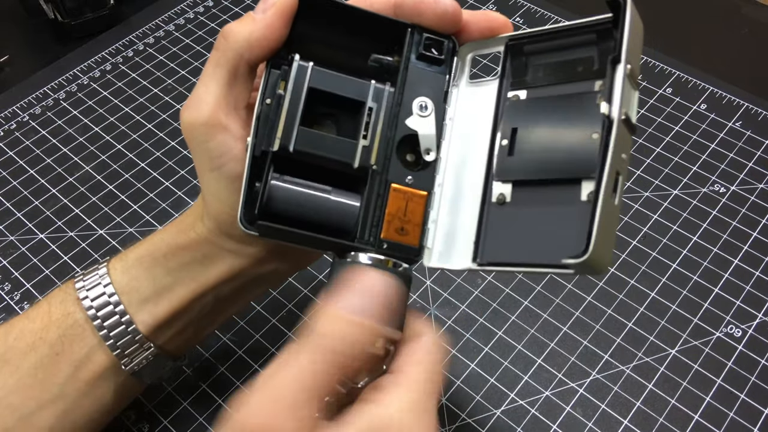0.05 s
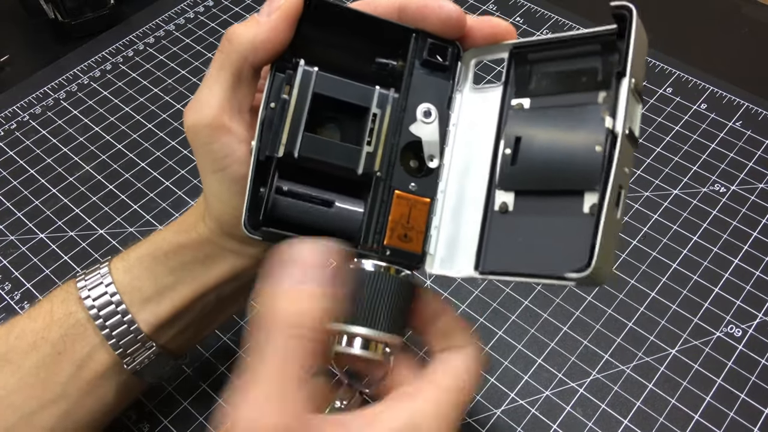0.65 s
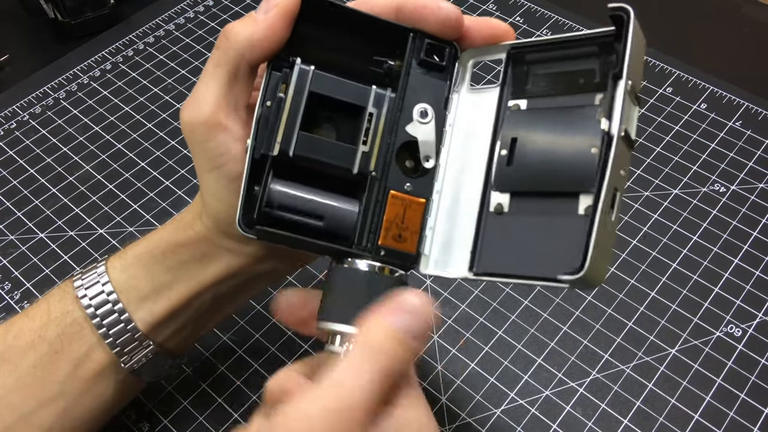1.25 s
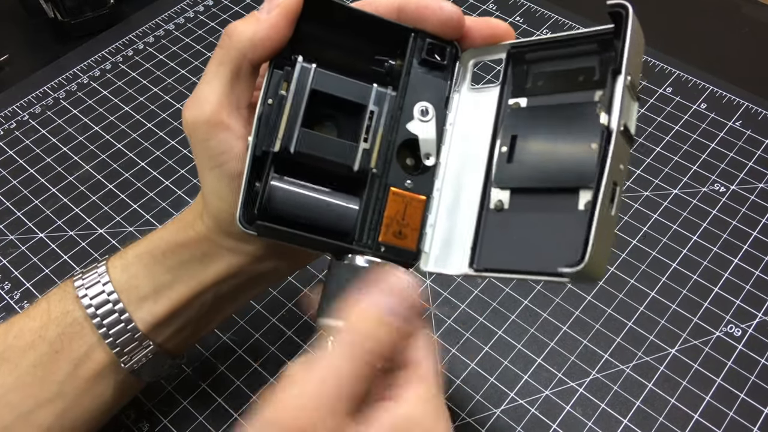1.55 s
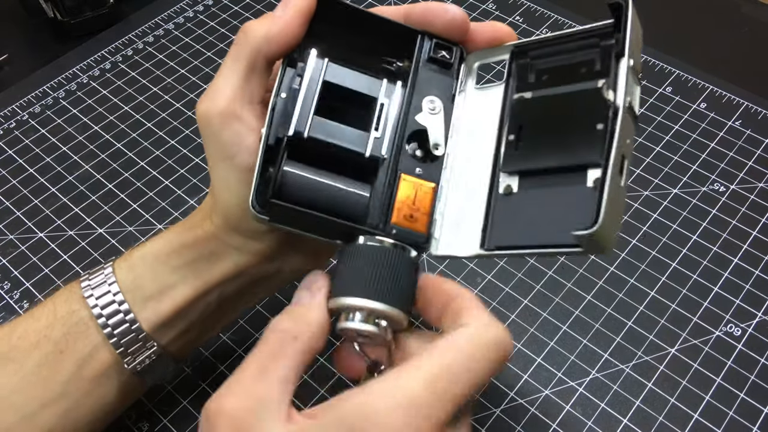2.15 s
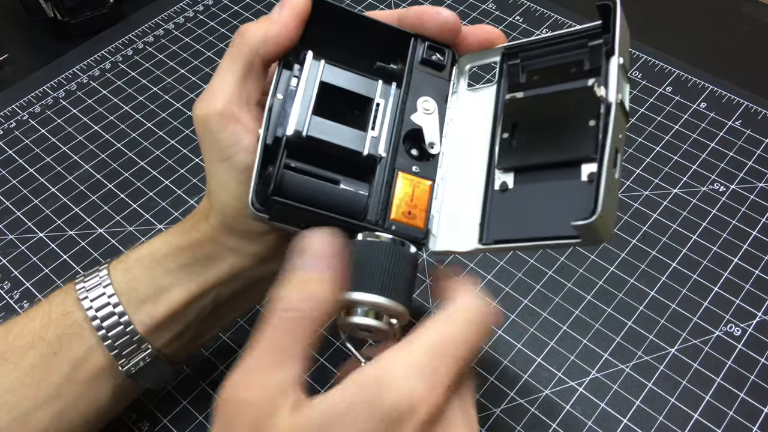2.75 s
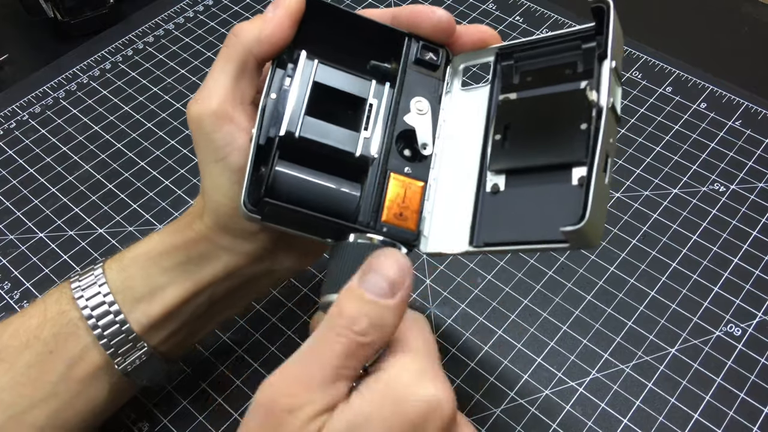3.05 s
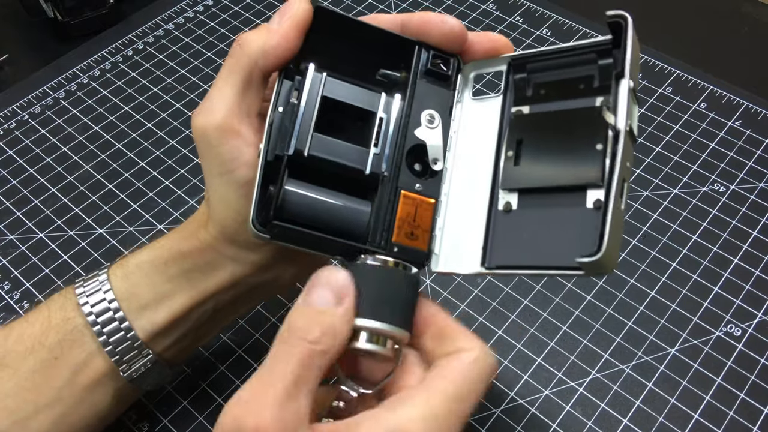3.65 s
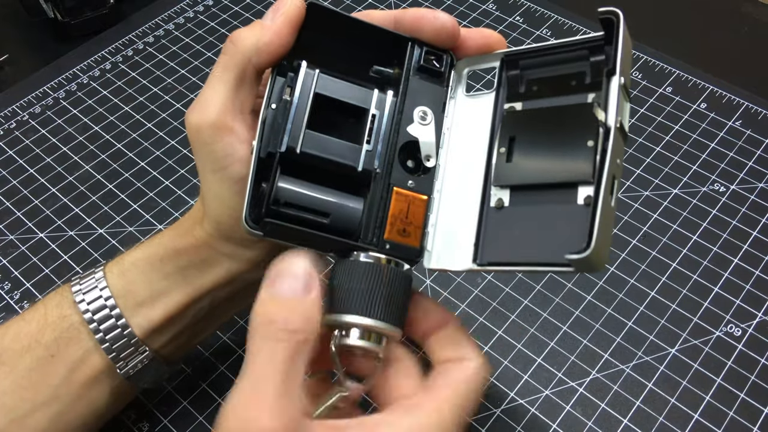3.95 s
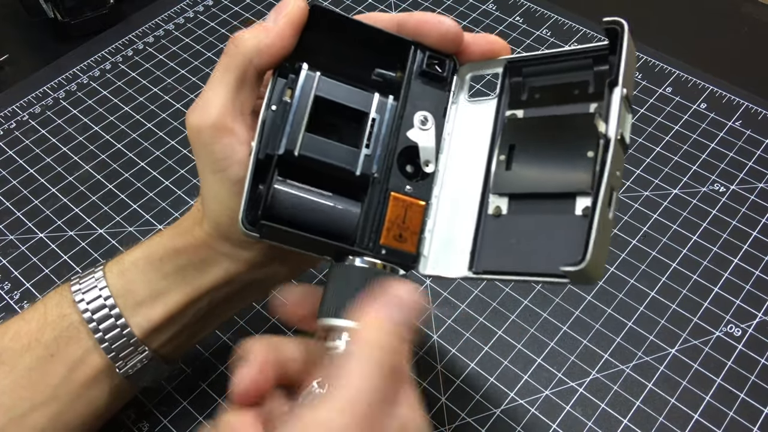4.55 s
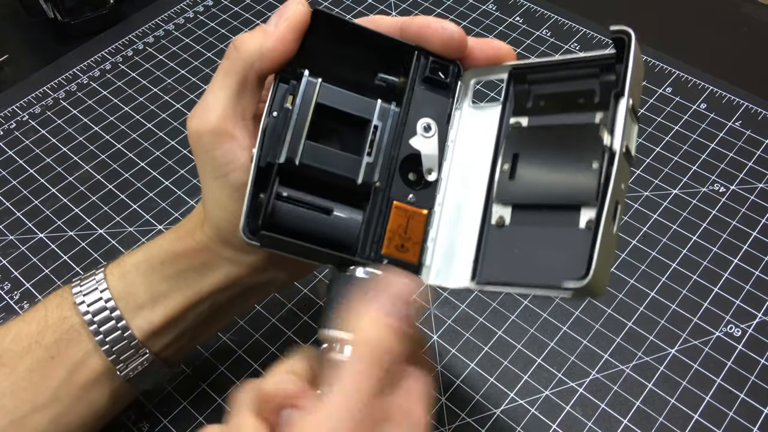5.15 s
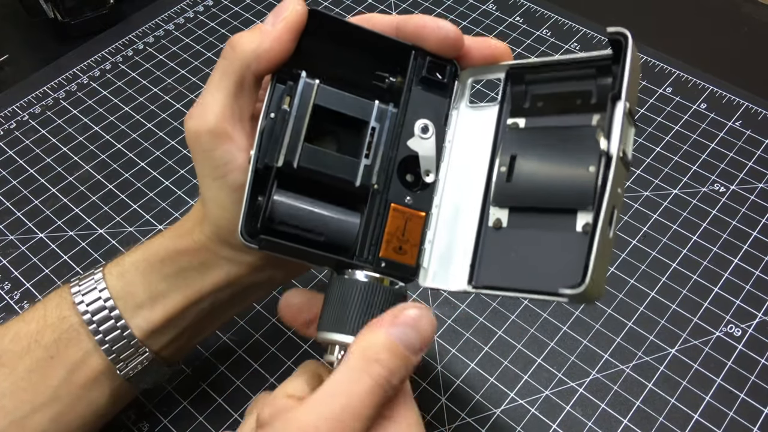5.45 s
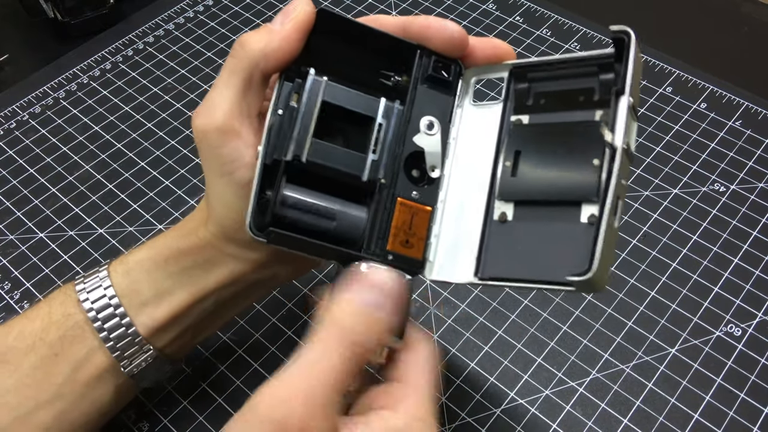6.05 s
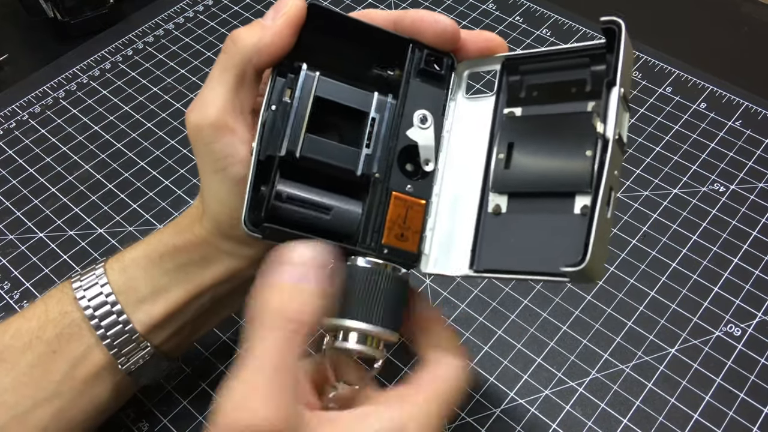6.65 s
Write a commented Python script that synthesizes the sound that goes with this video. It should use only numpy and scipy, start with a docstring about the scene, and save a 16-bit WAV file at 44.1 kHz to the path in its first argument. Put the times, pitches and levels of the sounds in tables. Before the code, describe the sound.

A camera's spring motor is wound by hand, each twist giving a short, bright ratcheting rasp, with light knocks between.

```python
"""A small workshop, one microphone close to a camera whose spring motor is being wound by hand.
Nineteen twists of the knurled grip: in each a steel pawl drops over ratchet teeth, single clicks,
a fast rasp, single clicks again, all ringing the open case. Between twists the fingers take a new hold
and knock the grip; its strap ring ticks now and then, and once a finger slips with a thin squeak.
Behind it are the room's short reverberation and the faint rumble of the building."""
import sys
import numpy as np
from scipy import signal
from scipy.fft import rfft, irfft, next_fast_len
from scipy.io import wavfile
from scipy.ndimage import uniform_filter1d, map_coordinates

SR = 44100
rng = np.random.default_rng(int(sys.argv[2]) if len(sys.argv) > 2 else 0)


def wav_out(sig):
    """Save sig, one row per channel (or a flat mono array), as 16-bit PCM at SR to the path in sys.argv[1]."""
    wavfile.write(sys.argv[1], SR, np.round(np.clip(np.atleast_2d(sig).T, -1, 1) * 32767).astype(np.int16))


N = 303849

# Levels of blows and colours are relative; each layer gets its own gain in the mix.
# colour of the building's rumble: f/Hz, level/dB
RUMBLE_COLOUR = [(7.1, -29), (12, 7.5), (21, 7), (30, -2.5), (59, -15.5), (97, -18.5), (137, -18.5),
                 (177, -29), (229, -34.5), (260, -49.5), (340, -53), (570, -120)]
# slow fade of the rumble: t/s, level/dB
RUMBLE_FADE = [(0, -33), (6.9, -36)]
# bands of the building's low drone: f/Hz, level/dB
DRONE_BANDS = [(70, -58), (135, -58.5)]
# the drone swells about halfway: t/s, gain/dB
DRONE_SWELL = [(2.6, -6), (3.5, 3)]
# colour of the room's hiss: f/Hz, level/dB
HISS_COLOUR = [(120, -27), (200, -2), (363, -9), (451, -16.5), (647, -13), (980, -16), (1910, -10.5),
               (4980, -24.5), (15000, -73)]
# twists of the grip: first drop t/s, wait for the second/s, last drop t/s, top speed/(teeth/s),
# snap level/dB, case ring re snap/dB, take-up ahead of the first drop/s, take-up level/dB
GRIP_TWISTS = [(-0.045, 0.0076, 0.1716, 265, -25.5, -6.5, 0.013, -21),
               (0.3537, 0.012, 0.5359, 196, -24, -7.5, 0.0061, -18),
               (0.7451, 0.011, 0.9249, 202, -24, -6, 0.011, -21.5),
               (1.1107, 0.0099, 1.2865, 182, -24.8, -6, 0.004, -38),
               (1.4641, 0.0098, 1.6562, 202, -24, -6, 0.002, -30),
               (1.8453, 0.0053, 2.0068, 186, -24, -6, 0.021, -26),
               (2.1873, 0.0074, 2.3421, 198, -24.5, -7, 0.0031, -23),
               (2.5254, 0.0076, 2.7025, 203, -24.5, -6, 0.013, -17.5),
               (2.8895, 0.0091, 3.0636, 190, -24, -5, 0.0088, -22),
               (3.242, 0.0081, 3.4758, 200, -24, -7, 0.019, -17.5),
               (3.637, 0.014, 3.8414, 212, -24, -7, 0.026, -37),
               (4.0282, 0.0118, 4.23, 230, -23.3, -8.5, 0.01, -19),
               (4.438, 0.0108, 4.6511, 230, -23.5, -6, 0.006, -27),
               (4.8545, 0.019, 5.0669, 238, -24, -6.5, 0.018, -43),
               (5.2659, 0.018, 5.4224, 117, -23.5, -6.5, 0.012, -21),
               (5.652, 0.014, 5.7837, 200, -24, -7, 0.0049, -18),
               (5.9995, 0.0072, 6.1404, 196, -23.6, -6.5, 0.018, -19),
               (6.3847, 0.0077, 6.5633, 200, -24, -6.5, 0.017, -21.5),
               (6.7706, 0.013, 6.96, 215, -23.5, -8, 0.009, -14)]
# early in some twists the spring's load catches with a hard clack: t/s, snap level/dB, ring level/dB
LOAD_CATCHES = [(0.369, -24, -21), (1.1261, -24, -27), (1.4815, -20, -22), (2.2012, -27, -23),
                (2.9083, -20, -22), (3.6613, -35, -34), (4.0458, -27, -25), (4.4552, -22, -24.5),
                (4.8787, -23, -25), (5.666, -41, -23.5), (6.7864, -22.5, -21.5)]
# colour of one drop of the pawl: f/Hz, level/dB
DROP_COLOUR = [(100, -34), (300.0, -30), (700.0, -16), (1100.0, -9), (1600.0, -10), (3700.0, -4),
               (5200.0, 3), (7500.0, 5), (10000.0, -5), (13000.0, -9.5), (15600.0, -5)]
# resonances of the case and grip: f/Hz, width/Hz, lift/dB
CASE_MODES = [(530, 20, 11.5), (964, 55, 1.2), (1472, 234, 12), (1733, 205, 8), (1945, 40, 7.5),
              (2184, 210, 8.5), (2473, 104, 6), (2706, 284, 7), (2950, 210, 5.5), (3360, 156, 5),
              (4545, 400, 5), (6120, 400, 3.5), (6900, 150, 3), (7000, 94, -0.5), (8600, 570, 3),
              (9530, 1300, 5), (10940, 1270, 6.5), (11870, 910, 6.5), (13320, 970, 9)]
# notes of the pawl spring and grip: f/Hz, level re snap/dB, chance per fast drop
SPRING_NOTES = [(2490, -5, 0.014), (2940, -2, 0.012), (6060, -3, 0.038), (7050, -5, 0.02)]
# the grip knocks in its bearing as the fingers take a new hold: t/s, level/dB, thud offset/dB
GRIP_KNOCKS = [(0.245, -25.5, -39), (1.0163, -22, -32), (1.4063, -23, -15), (1.7684, -12, -17.5),
               (3.1638, -17, -26), (3.4244, -13, -20), (3.5403, -27.5, -14.5), (3.6003, -24.5, -23),
               (3.9652, -17, -17), (4.377, -7, -22), (4.793, -23, -32), (5.486, -20.5, -29),
               (6.6418, -26, -27)]
# colour of a knock: f/Hz, level/dB
KNOCK_COLOUR = [(170, 2.5), (320, -1.5), (1050, 2.5), (1700, 0), (3200, 2), (5500, 0.5), (15000, -28)]
# light steel ticks of the loose strap ring: t/s, level/dB
STRAP_TICKS = [(0.718, -58), (3.179, -49), (4.785, -51), (5.96, -46)]
# a finger slips on the grip: t/s, length/s, start f/Hz, end f/Hz, level/dB
FINGER_SLIP = (1.6, 0.1, 14750, 14150, -47)
# the workshop's reverberation: f/Hz, t60/s
ROOM_DECAY = [(200, 0.32), (1500, 0.45), (5000, 0.71), (9000, 0.51), (15000, 0.36)]


def amp(db):
    """Decibels to gain."""
    return 10 ** (np.asarray(db) / 20)


def unit(x):
    """Scale to rms 1."""
    return x / np.sqrt(np.mean(x ** 2) + 1e-20)


def along(points, hz):
    """Read (f/Hz, value) points on a log frequency axis."""
    f, values = np.transpose(points)
    return np.interp(np.log(hz + 1), np.log(f + 1), values)


def below(hz, edge_hz, order=4):
    """Share of the power that lies under a crossover."""
    return 1 / (1 + (hz / edge_hz) ** (2 * order))


def filtered(x, gain, size=32768):
    """Pass x through the causal filter that has the given gain at each frequency."""
    hz = np.fft.rfftfreq(size, 1 / SR)
    cepstrum = irfft(np.log(np.maximum(gain(hz), 1e-6)))
    cepstrum[1:size // 2] *= 2  # fold to minimum phase
    cepstrum[size // 2 + 1:] = 0
    return signal.fftconvolve(x, irfft(np.exp(rfft(cepstrum))))[:N]


def coloured(x, gain):
    """Filter so that white noise keeps its power."""
    rms_gain = np.sqrt(np.mean(gain(np.linspace(0, SR / 2, SR // 2)) ** 2))
    return filtered(x, gain) / rms_gain


def noise(gain):
    """Steady coloured noise of rms 1."""
    return unit(coloured(rng.standard_normal(N), gain))


def add(track, s, sound):
    """Mix a sound into a track at time s."""
    start = int(np.clip(round(s * SR), 0, N))
    track[start:start + len(sound)] += sound[:N - start]


def room_tone():
    """Behind the camera: deep building rumble, a low drone and faint hiss."""
    t = np.arange(N) / SR
    fade = amp(np.interp(t, *np.transpose(RUMBLE_FADE)))
    swell = amp(np.interp(t, *np.transpose(DRONE_SWELL)))
    rumble = noise(lambda hz: amp(along(RUMBLE_COLOUR, hz)))
    drone = sum(amp(db) * noise(lambda hz: 1 / (1 + ((hz - centre) / 6) ** 2))
                for centre, db in DRONE_BANDS)
    hiss = noise(lambda hz: amp(along(HISS_COLOUR, hz)))
    return fade * rumble + swell * drone + amp(-58.5) * hiss


def twist(first, wait, last, top_speed, db, ring_db, creep_speed=62, jitter=0.11, scatter_db=1.23):
    """Pawl drops (t/s, snap/dB, ring/dB): one tooth, a wait, then the wrist speeds up and slows."""
    slip, force, colour = rng.standard_normal((80, 3)).T
    progress = np.linspace(0, 1, 200)
    arch = np.abs(np.sin(np.pi * progress)) ** 0.9  # a slightly flattened half sine
    speed = creep_speed + (top_speed - creep_speed) * arch  # teeth/s
    length = last - first - wait
    teeth = int(round(speed.mean() * length))
    angle = np.append(0, np.cumsum(np.exp(jitter * slip[:teeth])))
    when = np.interp(angle / angle[-1], np.cumsum(speed) / speed.sum(), progress)
    pace = np.interp(when, progress, arch)
    times = first + wait + when * length
    easing_db = -4 * np.exp((times - last) / 0.028)  # the hand eases off at the end
    level = db + scatter_db * force[:teeth + 1] + easing_db
    snap = level + 0.13 * pace
    ring = level + ring_db + 0.5 * pace + 0.5 * colour[:teeth + 1]
    snap[-2:] += [3, -1]  # the tooth before the last falls its full depth as the wrist brakes
    ring[-1] += 4  # the spring's load settles on the last tooth and rings the case
    return [(first, db, db + ring_db)] + list(zip(times, snap, ring))


def contact(rise_s, crack_t60, ring_t60, ring_db, bounce_db, bounce_s):
    """One blow on small metal parts: a crack, a rebound and a short dense ring; rms 1 over 4 ms."""
    t = np.arange(SR // 20) / SR
    since_bounce = t - bounce_s * rng.lognormal(0, 0.19)
    fall = np.log(1e6)  # 60 dB in power
    crack = np.exp(-fall * t / crack_t60)
    ring = amp(ring_db) ** 2 * np.exp(-fall * t / ring_t60)
    bounce_power = amp(bounce_db + 1.9 * rng.normal()) ** 2
    bounce = (since_bounce > 0) * bounce_power * np.exp(-fall * np.abs(since_bounce) / crack_t60)
    attack = 1 - np.exp(-t / rise_s)  # heavier parts take longer to get moving
    burst = np.sqrt(crack + ring + bounce) * attack * rng.standard_normal(len(t))
    return burst / np.sqrt(np.mean(burst[:SR // 250] ** 2))


def case_gain(colour, hz, narrowest_hz=50):
    """A blow's colour, lifted at the case's resonances; the holding hand keeps them all damped."""
    lift_db = sum(db / (1 + (2 * (hz - centre) / max(width, narrowest_hz)) ** 2)
                  for centre, width, db in CASE_MODES)
    return amp(along(colour, hz) + lift_db)


def turning_grip(x, depth_db=2.1, spacing_hz=550, changes_per_s=38):
    """As the grip turns under the fingers, its resonances come and go."""
    hz, t, spectrum = signal.stft(x, SR, nperseg=192, noverlap=144)
    knots = rng.standard_normal((int(hz[-1] / spacing_hz) + 2, int(t[-1] * changes_per_s) + 2))
    drift = map_coordinates(knots, np.meshgrid(hz / spacing_hz, t * changes_per_s, indexing="ij"))
    return signal.istft(spectrum * amp(depth_db * drift), SR, nperseg=192, noverlap=144)[1][:N]


def ratchet(drops):
    """Each pawl drop or catch of the load gives a bright steel snap and a slower ring of the case."""
    snaps, rings = np.zeros(N), np.zeros(N)
    for s, snap_db, ring_db in list(LOAD_CATCHES) + drops:
        snap = contact(rise_s=0.0001, crack_t60=0.0024, ring_t60=0.033,
                       ring_db=-2.5, bounce_db=-20, bounce_s=0.0025)
        ring = contact(rise_s=0.00097, crack_t60=0.014, ring_t60=0.041,
                       ring_db=-1, bounce_db=-4, bounce_s=0.001)
        add(snaps, s, amp(snap_db) * snap)
        add(rings, s, amp(ring_db) * ring)
    steel = coloured(snaps, lambda hz: case_gain(DROP_COLOUR, hz) * np.sqrt(1 - below(hz, 3660)))
    shell = coloured(rings, lambda hz: case_gain(DROP_COLOUR, hz) * np.sqrt(below(hz, 3890)))
    return turning_grip(amp(-4.5) * steel + amp(-3) * shell)


def workshop_reverb(x):
    """The room's answer, each frequency dying at its own speed, with a new tail as the hands move."""
    wet, block = np.zeros(N), SR // 3
    for start in range(0, N, block):
        hz, t, spectrum = signal.stft(rng.standard_normal(SR * 2 // 3), SR, nperseg=256)
        decay = amp(-60 * t / along(ROOM_DECAY, hz)[:, None])
        tail = signal.istft(spectrum * decay, SR, nperseg=256)[1]
        reflections = signal.fftconvolve(x[start:start + block], tail / np.linalg.norm(tail))
        add(wet, start / SR + 0.006, reflections)
    hz_db = [(190, 3.5), (400, -2.5), (1500, -16), (5000, -16.5), (9000, -20), (15000, -21)]
    return filtered(wet, lambda hz: amp(along(hz_db, hz)))


def pawl_spring(drops, t60=0.07, rise_s=0.0006, waver_hz=80, fast_gap_s=0.007):
    """Now and then a fast drop sets off a short metallic note of wavering pitch."""
    notes, t = np.zeros(N), np.arange(SR // 8) / SR
    for (s, snap_db, _), (next_s, _, _) in zip(drops, drops[1:]):
        for (hz, db, chance), luck in zip(SPRING_NOTES, rng.uniform(size=len(SPRING_NOTES))):
            if luck < chance and next_s - s < fast_gap_s:
                waver = unit(uniform_filter1d(rng.standard_normal(len(t)), size=128))
                phase = 2 * np.pi * np.cumsum(hz + waver_hz * waver) / SR
                envelope = amp(snap_db + db - 60 * t / t60) * (1 - np.exp(-t / rise_s))
                add(notes, s, envelope * np.sin(phase))
    return notes


def finger_ticks(ticks_per_s=59, tick_db=-41.5, scatter_db=12.5, thud_db=-22.5):
    """Rows like GRIP_KNOCKS: between twists, skin slides back over the knurls with faint ticks."""
    rows = []
    for previous, following in zip(GRIP_TWISTS, GRIP_TWISTS[1:]):
        end = previous[2]
        gap = following[0] - end
        for share, force in rng.uniform(size=(60, 2))[:int(ticks_per_s * gap)]:
            rows.append((end + share * gap, tick_db + scatter_db * force ** 2, thud_db))
    return rows


def take_ups(rebound_share=0.81, rebound_db=-3.5, thud_db=-30):
    """Rows like GRIP_KNOCKS: just before a twist the grip meets its load, rebounds, meets it again."""
    rows = []
    for first, *_, ahead, db in GRIP_TWISTS:
        rows.append((first - ahead, db, thud_db))
        rows.append((first - ahead * (1 - rebound_share), db + rebound_db, thud_db))
    return [row for row in rows if row[0] > 0]


def grip_knocks():
    """The grip takes up its play: a clack of the case and a thud of the hand-damped body."""
    clacks, thuds = np.zeros(N), np.zeros(N)
    for s, db, thud_db in list(GRIP_KNOCKS) + take_ups() + finger_ticks():
        clack = contact(rise_s=0.0004, crack_t60=0.024, ring_t60=0.12,
                        ring_db=-11, bounce_db=-2.5, bounce_s=0.0014)
        thud = contact(rise_s=0.00049, crack_t60=0.025, ring_t60=0.12,
                       ring_db=-9, bounce_db=-17, bounce_s=0.002)
        add(clacks, s, amp(db) * clack)
        add(thuds, s, amp(db + thud_db) * thud)
    shell = coloured(clacks, lambda hz: case_gain(KNOCK_COLOUR, hz) * np.sqrt(1 - below(hz, 1030)))
    body = coloured(thuds, lambda hz: amp(along(KNOCK_COLOUR, hz)) * np.sqrt(below(hz, 1450)))
    return amp(-20) * shell + amp(-4) * body


def strap_ring():
    """The little steel ring at the end of the grip swings against its lug."""
    ticks = np.zeros(N)
    for s, db in STRAP_TICKS:
        tick = contact(rise_s=0.0001, crack_t60=0.01, ring_t60=0.05,
                       ring_db=0, bounce_db=6, bounce_s=0.002)
        add(ticks, s, amp(db) * tick)
    return coloured(ticks, lambda hz: np.sqrt(1 - below(hz, 1500)))


def finger_squeak():
    """A thin whistle that sinks in pitch as the slipping finger slows."""
    s, length, from_hz, to_hz, db = FINGER_SLIP
    progress, track = np.linspace(0, 1, int(length * SR)), np.zeros(N)
    phase = 2 * np.pi * np.cumsum(to_hz + (from_hz - to_hz) * (1 - progress) ** 2) / SR
    envelope = amp(db) * np.sin(np.pi * np.sqrt(progress)) ** 2
    add(track, s, envelope * np.sin(phase))
    return track


def scene():
    """At the microphone, in mono: the camera close up, the workshop behind it."""
    background = room_tone()
    handling = grip_knocks() + strap_ring() + finger_squeak()
    drops = [drop for *row, _, _ in GRIP_TWISTS for drop in twist(*row) if drop[0] >= 0]
    camera = pawl_spring(drops) + ratchet(drops) + handling
    return (camera + workshop_reverb(camera) + background)[None]


def record(dry):
    """The recorder rolls off steeply at its band limit."""
    size = next_fast_len(N + SR // 2)
    rolloff = below(np.fft.rfftfreq(size, 1 / SR), edge_hz=15850, order=60)
    return irfft(rfft(dry, size) * rolloff, size)[:, :N]


dry = scene()
out = record(dry)
wav_out(out)
```